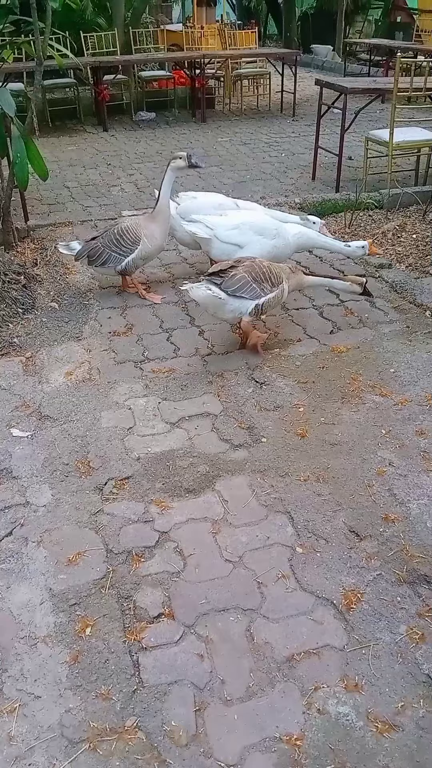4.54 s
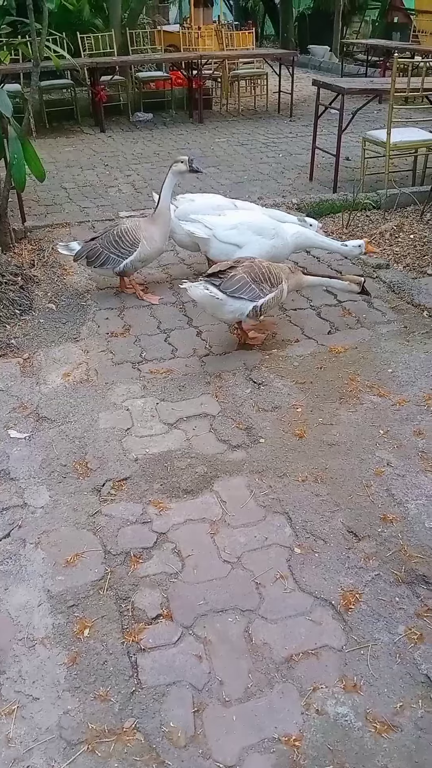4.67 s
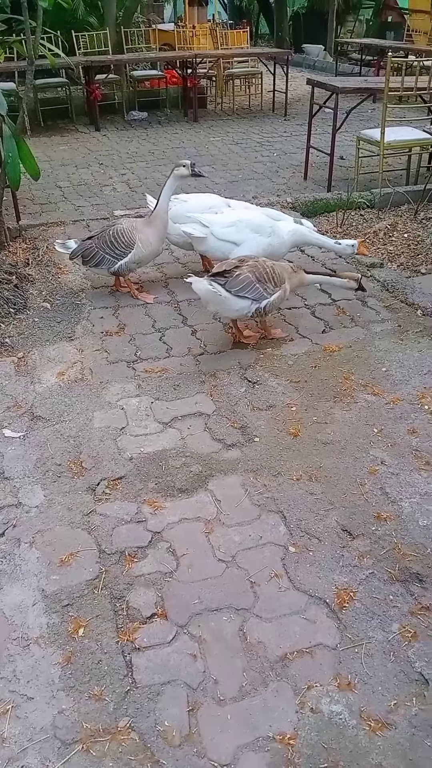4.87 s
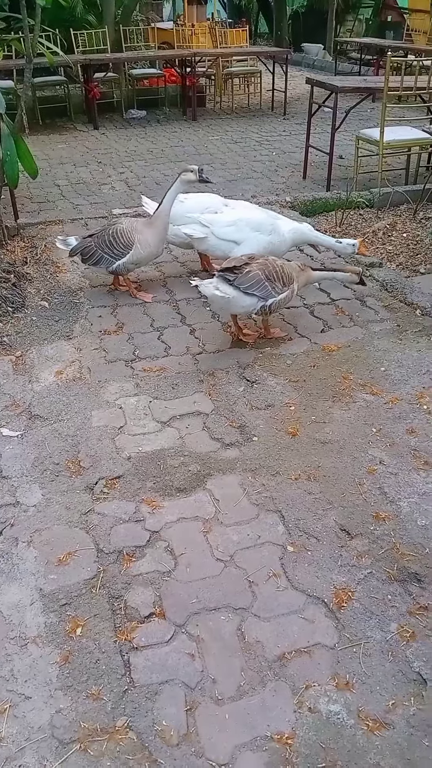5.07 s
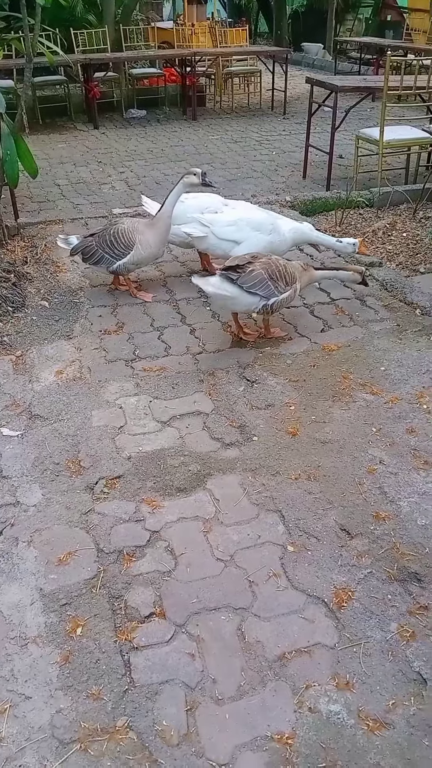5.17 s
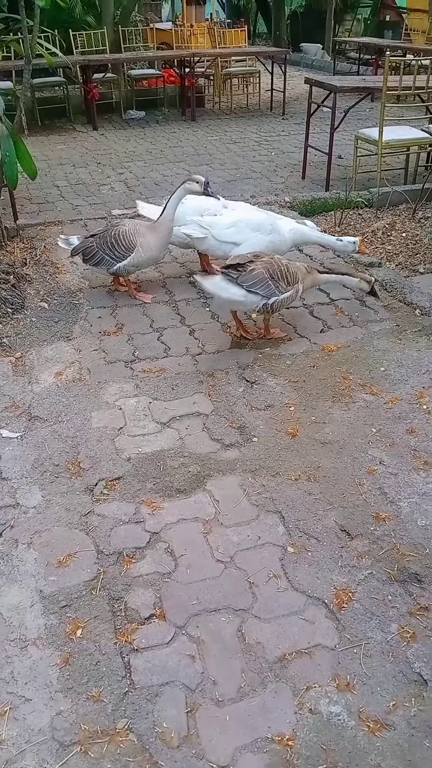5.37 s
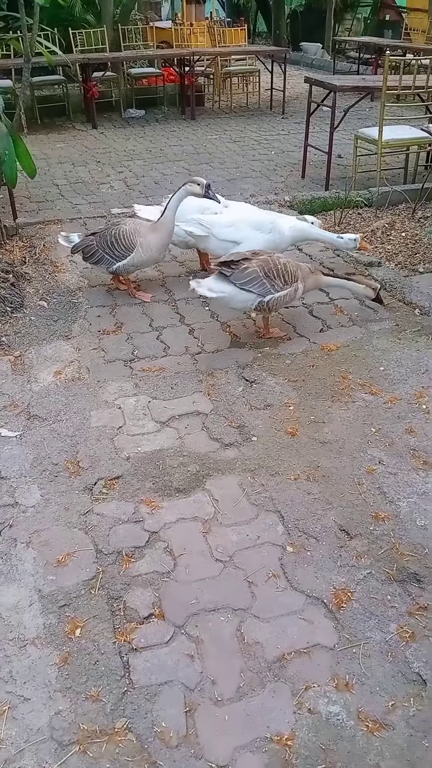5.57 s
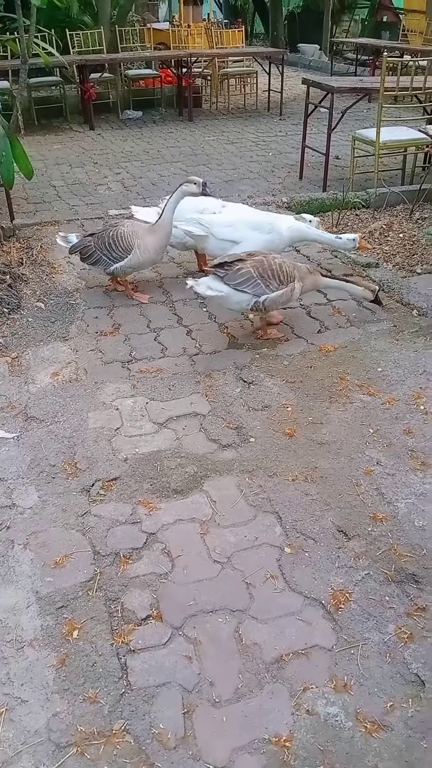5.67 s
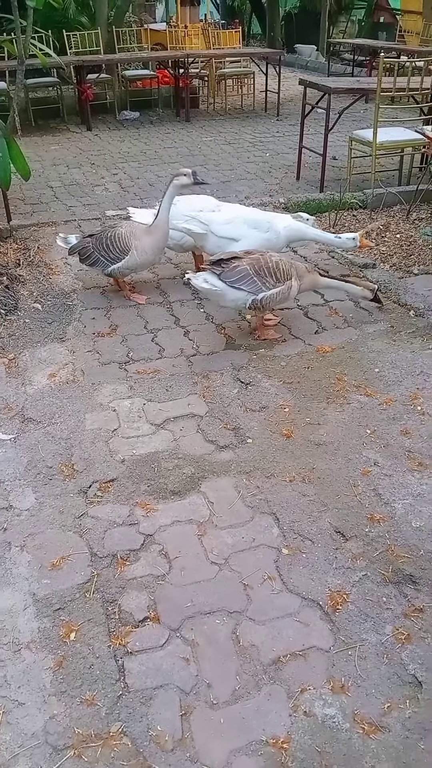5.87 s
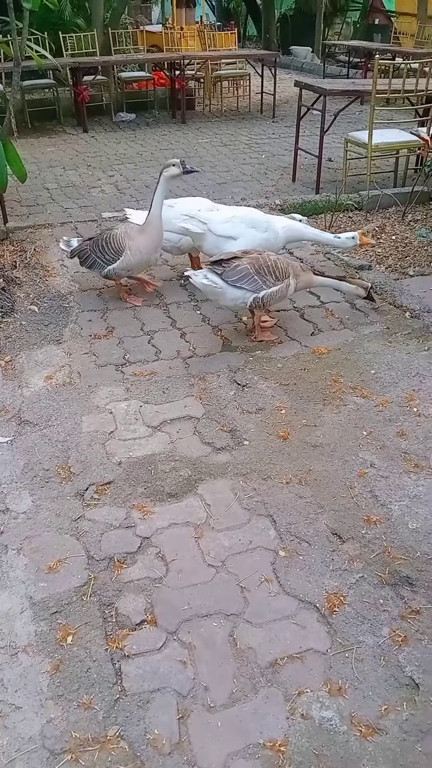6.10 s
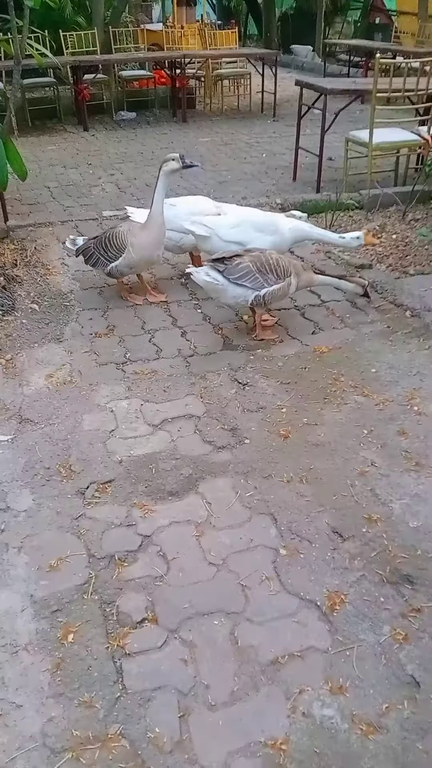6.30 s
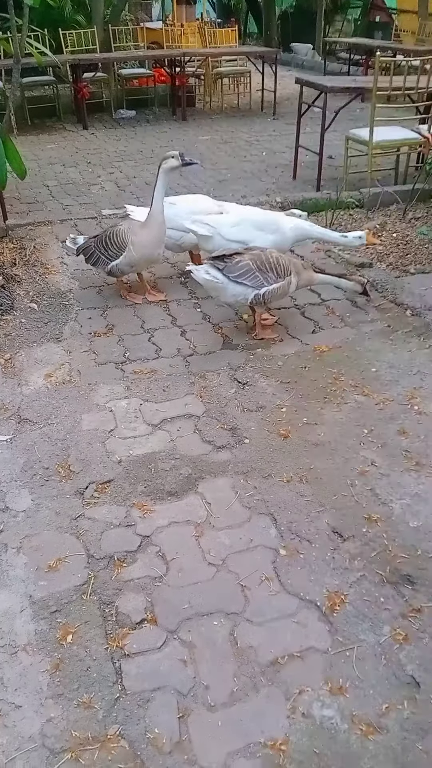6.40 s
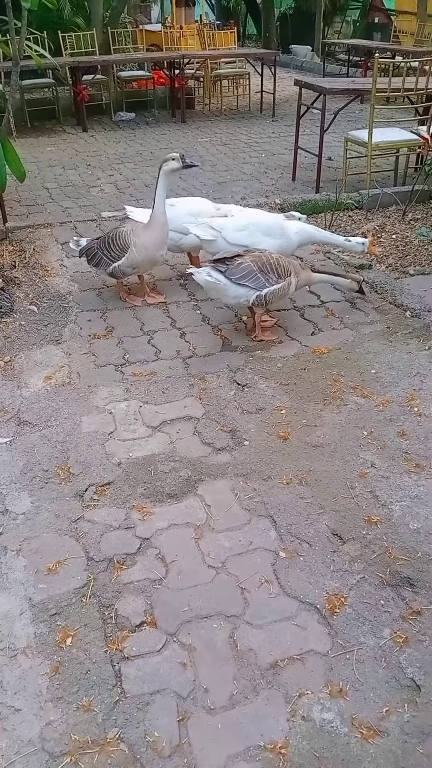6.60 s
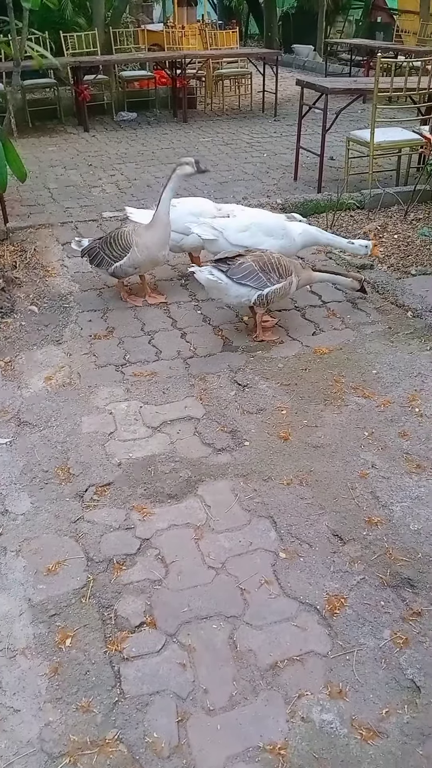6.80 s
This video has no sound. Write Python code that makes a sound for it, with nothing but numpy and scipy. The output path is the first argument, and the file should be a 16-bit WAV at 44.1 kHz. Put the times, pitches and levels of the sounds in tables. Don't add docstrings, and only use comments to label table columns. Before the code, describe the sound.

Several geese stand a few metres from a phone microphone in a paved yard. Two near birds trade long, high, brassy honks that overlap, each bout torn by hoarse rasp and often ending in quick falling cackles. Low throaty grunts slip in between, others call from behind, and a bill taps stone once. Nearby walls give short reflections; faint traffic rumbles far off.

```python
import sys
import numpy as np
from scipy import signal
from scipy.fft import rfft, irfft, next_fast_len
from scipy.io import wavfile
from scipy.ndimage import uniform_filter1d, map_coordinates

SR = 44100
rng = np.random.default_rng(int(sys.argv[2]) if len(sys.argv) > 2 else 0)


def bounce(signal):
    frames = np.transpose(np.atleast_2d(signal))
    limited = np.clip(frames, -1, 1)
    pcm = np.round(limited * 32767).astype(np.int16)
    wavfile.write(sys.argv[1], SR, pcm)


def nominal_scale(level):
    x = np.asarray(level, float) / 20
    return 10 ** x


N = 301644

# time in seconds, pitch in Hz, level in dB,
# beak opening from 0 to 1.
GANDER_HONKS = [
    [(.46, 955, -21, .4), (.55, 1091, -10, 0.2), (.66, 1102, -14, 0.52), (.77, 1102, -18.5, 0),
     (.9, 1130, -13, 0.31), (1.03, 1129, -12.5, 0.22), (1.09, 1115, -26.5, .1)],
    [(1.79, 923, -26.5, 0), (1.86, 1057, -20, 0), (2.0, 1097, -15, 0.6), (2.18, 1118, -13.5, 0.5),
     (2.27, 1082, -27, 0.5)],
    [(2.845, 1025, -27, 0.4), (2.89, 1081, -17.5, 1), (3.02, 1091, -15.5, 1.1), (3.12, 1103, -17, 1),
     (3.21, 1101, -16, 0.17), (3.245, 1104, -20, 0.07)],
    [(3.86, 1103, -23.5, .05), (4.04, 1108, -21.5, .05), (4.11, 1091, -22.5, 0.3), (4.24, 1114, -25, 0.63)],
    [(5.17, 1107, -13.5, .95), (5.24, 1098, -15, .95), (5.42, 1098, -15, .95), (5.49, 1121, -25, 0)],
    [(6.41, 933, -31.5, .3), (6.57, 1033, -18.5, 0.18), (6.72, 1108, -26.5, 0.75), (6.84, 1079, -12.5, 0.7)],
]
GANDER_ROUGHNESS = [.35, .25, .06, .1, .08, .3]
GANDER_RING_DB = [-4, -1.5, -0.5, 5, -1, -2]
# time in seconds, pitch in Hz, level in dB,
# beak opening from 0 to 1.
GOOSE_HONKS = [
    [(.48, 1169, -17.5, 0.24), (.58, 1220, -28, 0.16), (.7, 1248, -19, 0.033), (.79, 1222, -19, .6)],
    [(2.04, 1172, -20.5, 0.39), (2.2, 1196, -11.5, 0.31), (2.3, 1235, -13.5, 0.87), (2.49, 1274, -15, 1)],
    [(2.49, 1427, -18.5, 0.2), (2.56, 1430, -8, 0.1), (2.64, 1400, -24, .3)],
    [(3.53, 1148, -24, 0.44), (3.6, 1173, -18, 0.33), (3.68, 1178, -16.5, 0.43), (3.78, 1228, -20, 0.86)],
    [(3.79, 1168, -19, .6), (4.01, 1136, -19.5, 0.19)],
    [(4.98, 1127, -24.5, 0.18), (5.11, 1166, -17, 0.51), (5.22, 1195, -19.5, .1), (5.34, 1201, -17.5, .1)],
    [(5.35, 1132, -18, .1), (5.5, 1169, -23, 0.088), (5.58, 1072, -21, 0.96), (5.655, 940, -27.5, 0.53)],
    [(6.63, 1185, -25.5, 0.049), (6.72, 1255, -26, 0.28), (6.84, 1232, -37, 0.11)],
]
GOOSE_ROUGHNESS = [.3, .12, .1, .15, .3, .2, .4, 1]
GOOSE_RING_DB = [-3, -1.5, 0, -1.5, -4.5, -5, -9.5, -9.5]
# start in seconds, length in seconds, first pitch in Hz, last pitch in Hz, level in dB.
CACKLES = [
    (1.093, 0.1, 820.6, 784, -14),
    (1.203, 0.076, 1098, 1038, -18),
    (2.251, .14, 798, 746, -18),
    (3.244, .085, 773, 675, -21.5),
    (3.328, .05, 563, 536, -22.5),
    (4.241, .085, 784, 689, -21.5),
    (4.32, .07, 589, 555, -27.5),
    (5.477, .085, 787, 667, -19.5),
    (5.552, 0.038, 564, 520, -29),
]
# frequency in Hz, gain in dB.
CACKLE_THROAT = [(550, -0.5), (780, 1), (1080, -2), (1550, -7.5), (2250, -6.5), (3100, -10.5), (3800, -8),
                 (5400, -33.5)]
# time in seconds, air flow in dB,
# beak opening from 0 to 1.
RASP_BOUTS = [
    [(.14, -33.5, 0.47), (.32, -43, 0.97), (.36, -23, .3), (.42, -13.5, 0.25), (.62, -15.5, 0.54),
     (1.07, -16.5, 0.65), (1.2, -30, 0), (1.62, -47.5, 0.04)],
    [(1.72, -44.5, 0), (1.79, -25.5, 0.5), (1.96, -18, 0.3), (2.22, -14.5, 0.53), (2.45, -9, 0.53),
     (2.66, -19.5, 0.66), (2.8, -33, 0.03)],
    [(2.82, -17, 0.45), (2.95, -34.5, 0.66), (3.22, -37, .85), (3.32, -24.5, 0.67), (3.42, -30.5, 0.53)],
    [(3.425, -26, 0), (3.5, -18.5, 0.14), (3.66, -26.5, 0.72), (3.76, -21, 0.76), (4.05, -18, 0.56),
     (4.2, -31.5, 0.58), (4.37, -44, 1), (4.45, -45, 0.4)],
    [(4.81, -27.5, 0.4), (5.15, -15.5, 0.43), (5.3, -19, 0.48), (5.4, -12.5, 0.43), (5.62, -21, 0.39),
     (5.67, -29.5, .1)],
    [(6.2, -52, .2), (6.32, -44, .1), (6.35, -27, 0.24), (6.5, -34, .7), (6.55, -24.5, 0.38),
     (6.84, -17, 0.4)],
]
# frequency in Hz, level in dB.
RASP_THROAT = [(400, -29), (650, -21.5), (850, -3), (1200, 2), (2000, -7.5), (3000, -31)]
# frequency in Hz, level in dB.
RASP_BEAK = [(1800, -30), (2400, 6.5), (3300, 11), (4300, 5.5), (5800, -8.5), (15700, -80.5)]
# start in seconds, length in seconds, flap rate in Hz, throat level in dB, chest level in dB.
GRUNTS = [
    (.36, .17, 146.2, -28.5, -41.5),
    (1.97, .1, 152, -27.5, -39),
    (3.43, .19, 151.7, -31.5, -41),
    (4.82, .16, 150.4, -28.5, -40),
    (5.05, .27, 158.4, -35.5, -36.5),
    (6.52, .5, 145.2, -28, -70),
]
# centre in Hz, width in Hz, gain in dB.
GRUNT_THROAT = [(1220, 165, 9.5), (1550, 360, 1), (3690, 780, -5.5), (417, 320, -3)]
# time in seconds, peak in dB.
PECKS = [
    (1.501, -32),
    (4.824, -48),
]
# start in seconds, length in seconds, first pitch in Hz, last pitch in Hz,
# level in dB.
THIRD_BIRD = [(0.327, 0.14, 903, 834, -33), (0.674, 0.37, 1311, 1335, -20.5),
              (2.375, 0.11, 1110, 1037, -18.5), (2.598, 0.12, 955, 944, -27),
              (3.074, 0.23, 1280, 1307, -40.5), (3.341, 0.082, 1052, 934, -28),
              (3.738, 0.12, 1359, 1380, -27), (4.346, 0.072, 1030, 932, -25.5),
              (4.942, 0.14, 851, 868, -22), (5.301, .11, 1397, 1324, -26), (6.33, 0.23, 756, 882, -37)]
# start in seconds, length in seconds, first pitch in Hz, last pitch in Hz,
# level in dB.
FOURTH_BIRD = [(0.202, 0.22, 1470, 1520, -40), (0.752, 0.16, 1786, 1742, -19.5),
               (.89, .09, 1440, 1518, -24), (2.61, .11, 1150, 1100, -21), (3.801, 0.16, 998, 990, -26.5),
               (4.36, 0.061, 876, 784, -31), (4.95, 0.086, 894, 1108, -27)]
# start in seconds, length in seconds, pitch in Hz, first level in dB,
# change in dB per second.
WHISTLES = [
    (0, 0.17, 1837, -41, -26),
    (1.73, 0.079, 1695, -39.5, 8),
    (3.87, 0.21, 2510, -27, -5),
    (4.258, 0.55, 3482, -35, -32),
    (5.5, 0.31, 2160, -24, -110),
]
# time in seconds, pitch in Hz, level in dB.
SONGBIRD = [
    [(6.05, 3330, -59), (6.12, 3000, -55), (6.2, 2760, -53)],
]
# frequency in Hz, density in dB per Hz.
YARD_SPECTRUM = [(30, -10), (150, -5.5), (273, -16.5), (1300, -16.5), (3400, -23.5), (5500, -43),
                 (15700, -44)]
# frequency in Hz, time to fall 60 dB in seconds.
WALL_DECAY = [(500, 0.15), (2500, 0.4), (10000, 0.047)]
# frequency in Hz, gain in dB.
MICROPHONE = [(25, -31), (60, -0.5), (120, 3.5), (6300, -2), (8500, -0.5), (9300, -6.5), (10000, -18.5),
              (13800, -11), (15700, -15)]


def geese():
    return near_honks() + cackles() + third_bird() + far_birds()


def near_honks():
    gander = [honk(rows, ring_db, count=4, overtone_db=-19, beak_db=13, bloom_db=-8, effort=0.045)
              for rows, ring_db in zip(GANDER_HONKS, GANDER_RING_DB)]
    goose = [honk(rows, ring_db, count=3, overtone_db=-22, beak_db=20, bloom_db=3, effort=0.14)
             for rows, ring_db in zip(GOOSE_HONKS, GOOSE_RING_DB)]
    first = syrinx(gander, GANDER_ROUGHNESS, top_db=-11.5, under_db=-37, octave_db=-1.0, breath_db=17, veil=0.55)
    second = syrinx(goose, GOOSE_ROUGHNESS, top_db=-10.5, under_db=-34.5, breath_db=17)
    return first + second


def honk(rows, ring_db, count, overtone_db, beak_db, bloom_db, effort):
    beak_shut_hz, beak_wide_hz, beak_width_hz = 2066, 4544, 806
    bloom_s = 0.16
    s, *columns = np.transpose(rows)
    t = np.linspace(s[0], s[-1], num=40)
    hz, db, opening = (np.interp(t, s, column) for column in columns)
    beak_hz = beak_shut_hz + (beak_wide_hz - beak_shut_hz) * opening
    bloom = bloom_db * np.exp(-(t - t[0]) / bloom_s)
    over_db = db + effort * (db + 9.5) + overtone_db + ring_db + bloom
    partials_db = [db]
    for k in range(2, count + 1):
        lift_db = beak_db * np.exp(-((k * hz - beak_hz) / beak_width_hz) ** 2)
        partials_db.append(over_db + lift_db)
    return np.transpose([t, hz] + partials_db)


def syrinx(tables, roughs, top_db, under_db=-60, octave_db=-6, breath_db=-3.5, veil=0):
    clears_s, clearing_s = 0.13, 0.037
    breath_in_s = 0.058
    out = np.zeros(N)
    for rows, rough in zip(tables, roughs):
        first, gate, (hz, *levels) = read_track(rows)
        count = len(hz)
        t = np.arange(count) / SR
        chance = lambda rate: wobble(count=count, rate=rate)
        waver = .0015 * chance(50) + rough * .024 * chance(200)
        phase = 2 * np.pi * np.cumsum(hz * (1 + waver)) / SR
        flutter_db = .5 * chance(40) + rough * 3.5 * chance(160)

        tone = nominal_scale(levels[0]) * np.sin(phase)
        for k, db in enumerate(levels[1:], 2):
            tone += nominal_scale(db + rough * 6 * chance(30)) * np.sin(k * phase + k * k)

        bright_db = np.mean(levels[-2:], axis=0) + top_db
        haze = rough + veil / (1 + np.exp(np.minimum((t - clears_s) / clearing_s, 50)))
        strength_db = bright_db - 24 * haze
        for k in range(len(levels) + 1, int(15600 / hz.max()) + 1):
            fall_db = octave_db * np.log2(k / len(levels))
            tone += nominal_scale(strength_db + fall_db + 4 * chance(15)) * np.sin(k * phase + k * k)

        breath = haze * (1 - np.exp(-t / breath_in_s)) * nominal_scale(bright_db + breath_db)
        tone += breath * np.diff(rng.standard_normal(count + 1))
        undertone = np.sin(phase / 2) + np.sin(3 * phase / 2)
        tone += nominal_scale(levels[0] + under_db + 6.6 * chance(14.35)) * undertone
        out[first:first + count] += np.sqrt(2) * gate * nominal_scale(flutter_db) * tone
    return out


def cackles():
    roughs = [.04 if row[2] > 650 else .12 for row in CACKLES]
    return syrinx([cackle(*row) for row in CACKLES], roughs, top_db=-5.5, octave_db=-17.5, breath_db=-3)


def cackle(s, length, first_hz, last_hz, db):
    u = np.linspace(0, 1, num=12)
    hz = first_hz + (last_hz - first_hz) * u ** 1.6
    level_db = db + np.interp(u, [0, 0.18, 1], [-18, 0, -9])
    partials_db = [level_db + along(CACKLE_THROAT, k * hz) for k in range(1, 6)]
    return np.transpose([s + length * u, hz] + partials_db)


def rasp():
    throat_loss_db, shut_loss_db = -9, -22
    swell_s = 0.033
    throat = coloured(torn_air(streak_db=6.0, puff_db=0), RASP_THROAT)
    beak = coloured(torn_air(streak_db=3.8, puff_db=1.5), RASP_BEAK)
    out = np.zeros(N)
    for rows in RASP_BOUTS:
        first, gate, (air_db, opening) = read_track(rows)
        throat_db = air_db + throat_loss_db * opening
        beak_db = air_db + shut_loss_db * (1 - opening)
        span = slice(first, first + len(gate))
        swell = 1 - np.exp(-(np.arange(len(gate)) / SR / swell_s) ** 2)
        air = nominal_scale(throat_db - 3.0) * throat[span] + nominal_scale(beak_db) * beak[span]
        out[span] = gate * swell * air
    return out


def torn_air(streak_db, puff_db):
    z = signal.stft(rng.standard_normal(N), nperseg=1024)[2]
    streaks = uniform_filter1d(rng.standard_normal(z.shape), size=2, axis=0)
    streaks = uniform_filter1d(streaks, size=6, axis=1)
    air = signal.istft(z * nominal_scale(streak_db * unit(streaks)), nperseg=1024)[1][:N]
    return air * nominal_scale(puff_db * wobble(count=N, rate=300))


def grunts():
    flaps, chest = np.zeros(N), np.zeros(N)
    for row in GRUNTS:
        first, gate, (hz, throat_db, chest_db) = read_track(grunt(*row))
        count = len(hz)
        turns = np.cumsum(hz * (1 + 0.037 * wobble(count=count, rate=120))) / SR
        at = np.flatnonzero(np.diff(np.floor(turns)))
        size_db = 2.0 * wobble(count=count, rate=150)
        flaps[first + at] = (gate * nominal_scale(throat_db + size_db + 34.5))[at]
        chest[first:first + count] = np.sqrt(2) * gate * nominal_scale(chest_db) * np.sin(2 * np.pi * turns)
    return filtered(flaps, grunt_throat) + chest


def grunt(s, length, hz, throat_db, chest_db):
    t = length * np.array([0, .4, 1])
    throat = throat_db + np.array([-6, 0, -17])
    chest = chest_db + np.array([-14, 0, -15.5])
    return np.transpose([s + t, hz + 60 * (t - t[1]), throat, chest])


def grunt_throat(hz):
    response = 0
    for k, (centre, width, db) in enumerate(GRUNT_THROAT):
        damping = 1j * hz * width
        response = response + (-1) ** k * nominal_scale(db) * damping / (centre * centre - hz * hz + damping)
    return response


def pecks():
    out, t = np.zeros(N), np.arange(SR // 50) / SR
    for s, db in PECKS:
        out[round(s * SR):][:len(t)] += nominal_scale(db - 60 * t / .014) * rng.standard_normal(len(t))
    return filtered(out, lambda hz: hz ** 2 / (hz ** 2 + 2500 ** 2))


def third_bird():
    calls = [far_call(*row, octave_db=-18.5) for row in THIRD_BIRD]
    return syrinx(calls, [.55] * len(calls), top_db=-16)


def far_birds():
    calls = [far_call(*row, octave_db=-11.5) for row in FOURTH_BIRD]
    calls += [whistle(*row) for row in WHISTLES] + SONGBIRD
    roughs = [1.3 if rows[0][0] < .3 else .4 for rows in calls]
    return syrinx(calls, roughs, top_db=-10.5)


def far_call(s, length, first_hz, last_hz, db, octave_db):
    attack_s, release_s = min(0.042, length / 3), min(0.019, length / 2)
    t = np.array([0, attack_s, length - release_s, length])
    level_db = db + np.array([-6.5, 0, 0, -7])
    hz = first_hz + (last_hz - first_hz) * t / length
    return np.transpose([s + t, hz, level_db, level_db + octave_db])


def whistle(s, length, hz, db, fade):
    last_db = db + fade * length
    return [(s, hz, db, db - 72), (s + length, hz, last_db, last_db - 57)]


def walls(x):
    out, hop = np.zeros(N + SR), SR // 4
    fade = np.hanning(2 * hop + 1)[:-1]
    padded = np.pad(x, (hop, 2 * hop))
    for start in range(0, N + hop, hop):
        hz, t, z = signal.stft(rng.standard_normal(SR // 2), SR, nperseg=256)
        decay = nominal_scale(-60 * t / along(WALL_DECAY, hz)[:, None])
        tail = signal.istft(z * decay, SR, nperseg=256)[1]
        part = signal.fftconvolve(padded[start:start + 2 * hop] * fade, tail / np.linalg.norm(tail))
        out[start:][:len(part)] += part[:len(out) - start]
    return out[hop - 400:][:N]


def yard():
    level_db = -45.5 + 1.2 * wobble(count=N, rate=3)
    return nominal_scale(level_db) * coloured(rng.standard_normal(N), YARD_SPECTRUM)


def unit(x):
    return x / np.sqrt(np.mean(x ** 2) + 1e-20)


def along(points, hz):
    f, v = np.transpose(points)
    return np.interp(np.log(hz + 1), np.log(f + 1), v)


def read_track(rows):
    s, *columns = np.transpose(rows)
    first = max(round(s[0] * SR), 0)
    t = np.arange(first, min(round(s[-1] * SR), N)) / SR
    gate = np.clip(np.minimum(t - t[0], t[-1] - t) / 0.0029, 0, 1)
    return first, gate, [np.interp(t, s, column) for column in columns]


def wobble(count, rate):
    knots = rng.standard_normal(int(SR * 7 * 2e-2))
    return map_coordinates(knots, [np.arange(count) * rate / SR], order=3, mode="wrap")


def filtered(x, response):
    m = next_fast_len(N + 8192)
    return irfft(rfft(x, m) * response(np.fft.rfftfreq(m, 1 / SR)), m)[:N]


def coloured(x, spectrum):
    return unit(filtered(x, lambda hz: nominal_scale(along(spectrum, hz))))


def scene():
    flock = geese() + rasp() + grunts() + pecks()
    return (flock + nominal_scale(-10.5) * walls(flock) + yard())[None]


def low_pass(x):
    return signal.sosfilt(signal.butter(12, 15710, fs=SR, output="sos"), x)


def record(dry):
    heard = filtered(dry[0], lambda hz: nominal_scale(along(MICROPHONE, hz)))
    held = heard / (1 + np.abs(heard / .9) ** 6) ** (1 / 6)
    return low_pass(held[None])


dry = scene()
out = record(dry)
bounce(out)
```